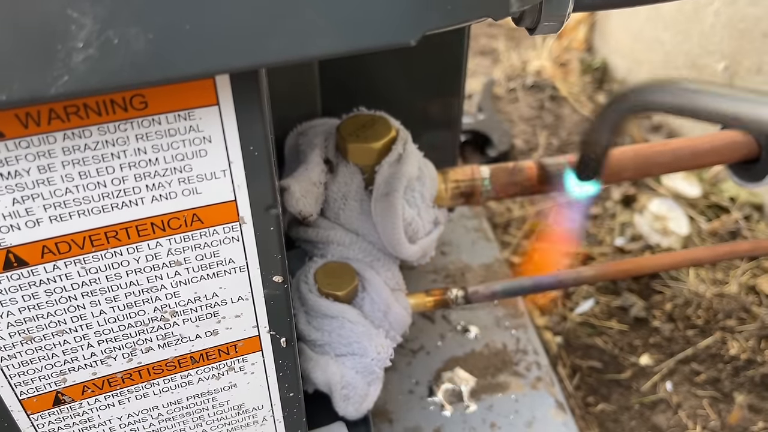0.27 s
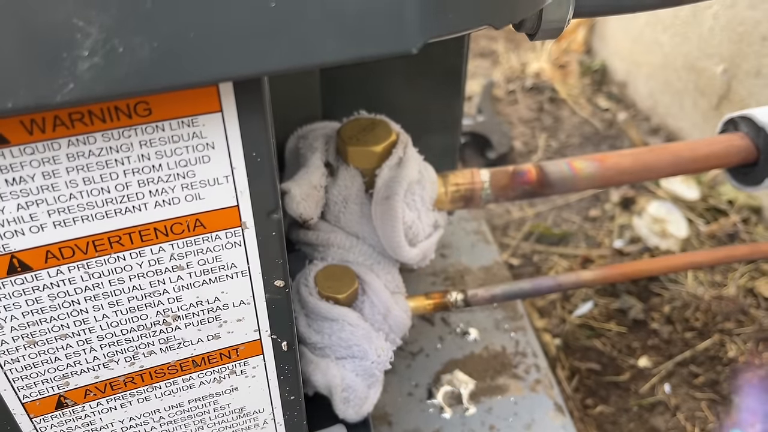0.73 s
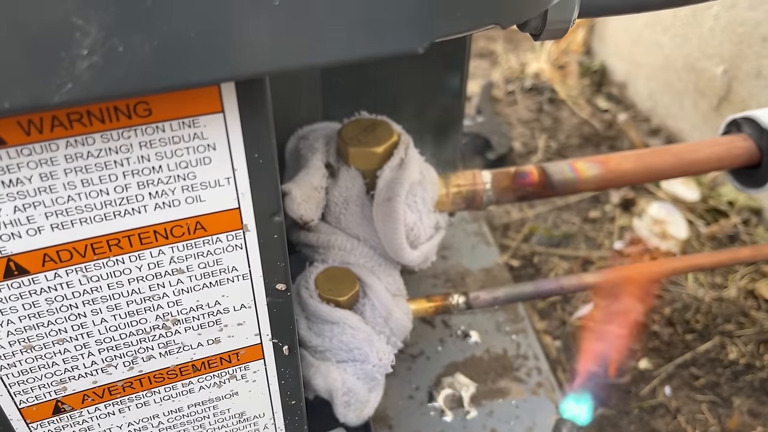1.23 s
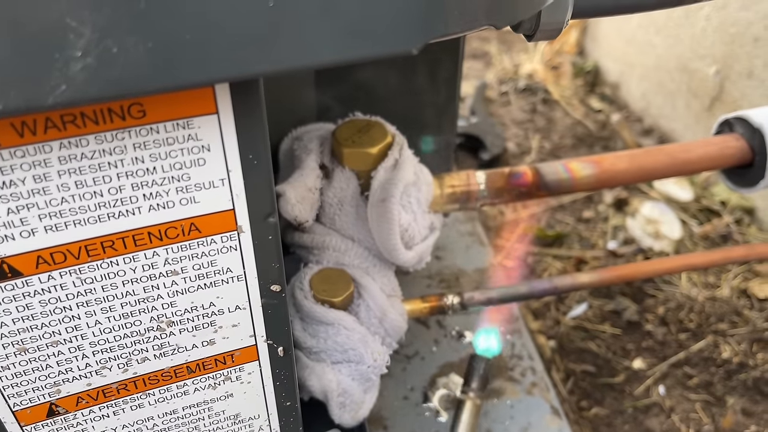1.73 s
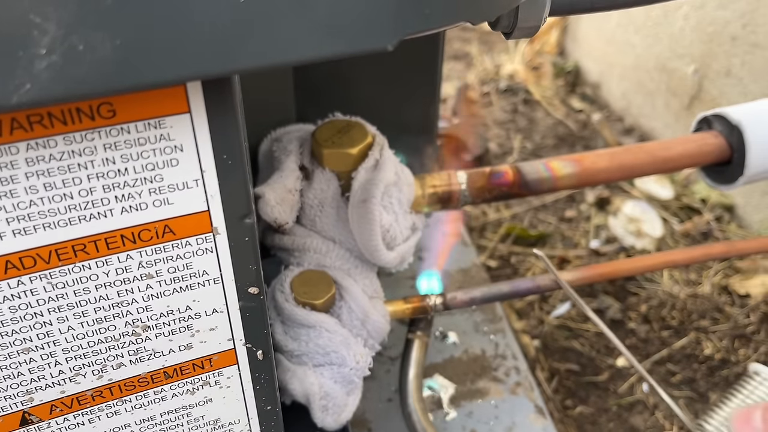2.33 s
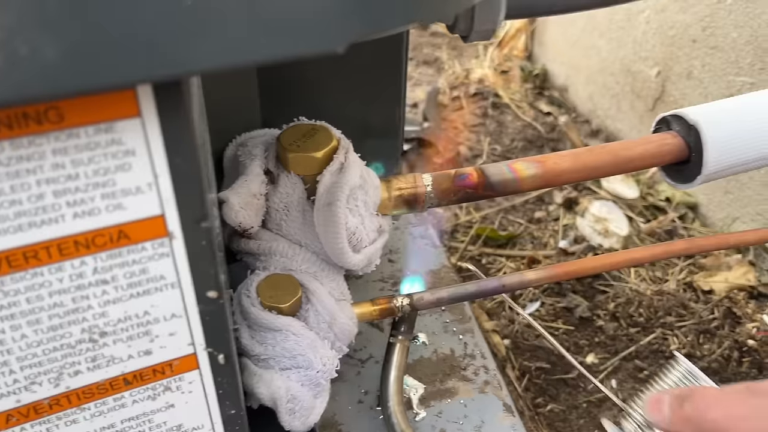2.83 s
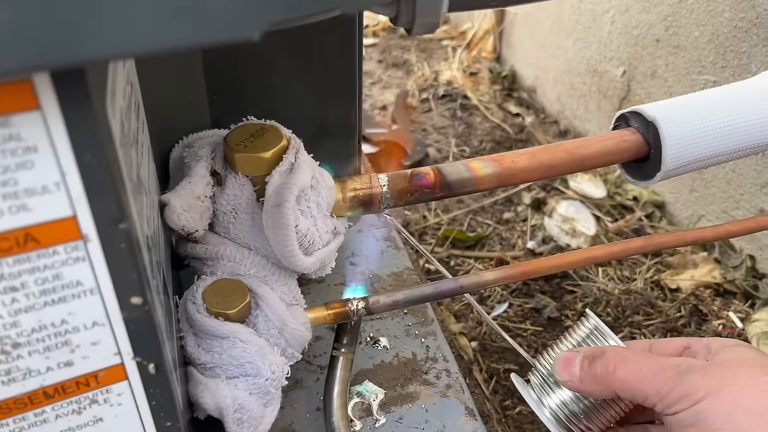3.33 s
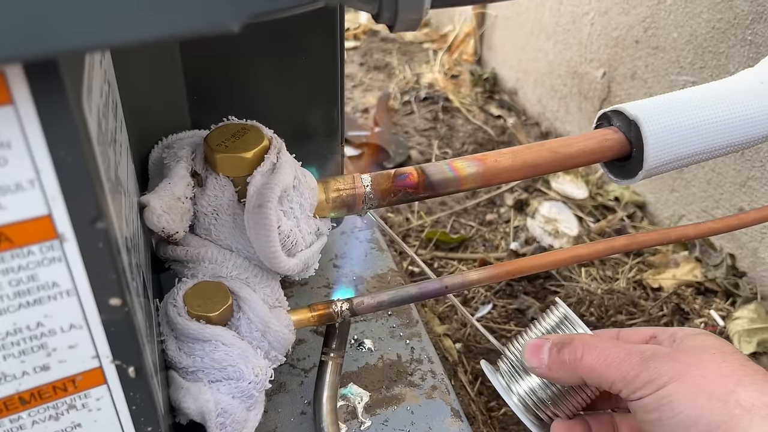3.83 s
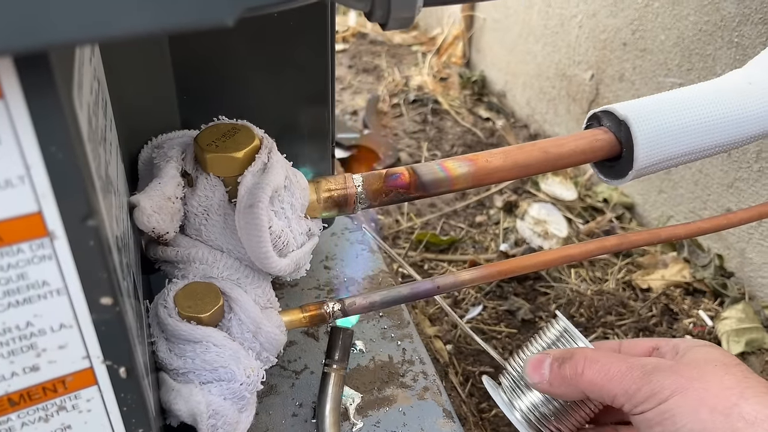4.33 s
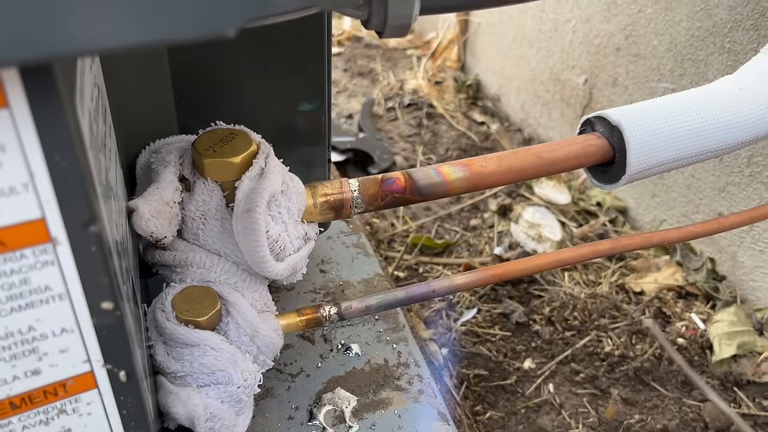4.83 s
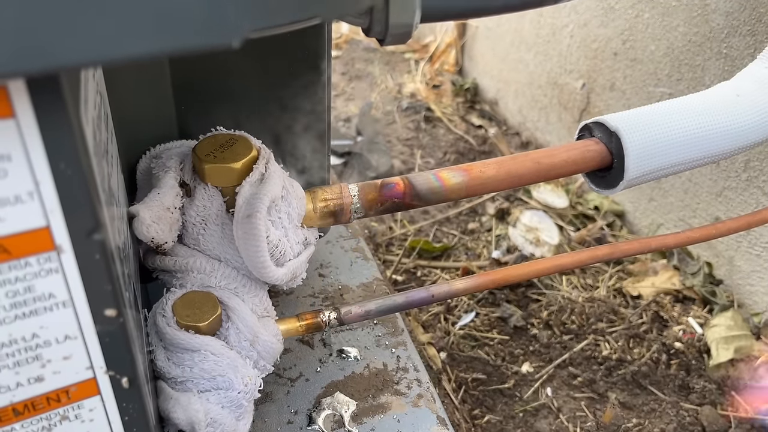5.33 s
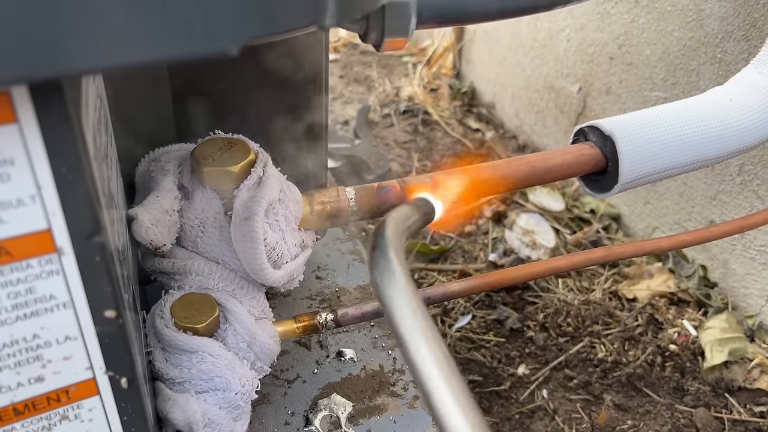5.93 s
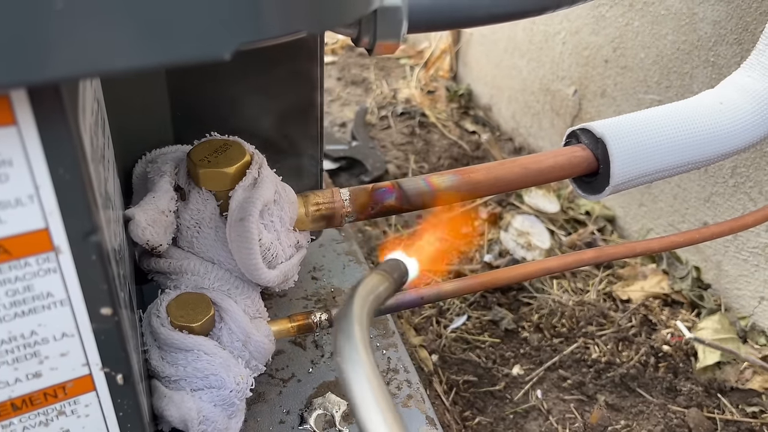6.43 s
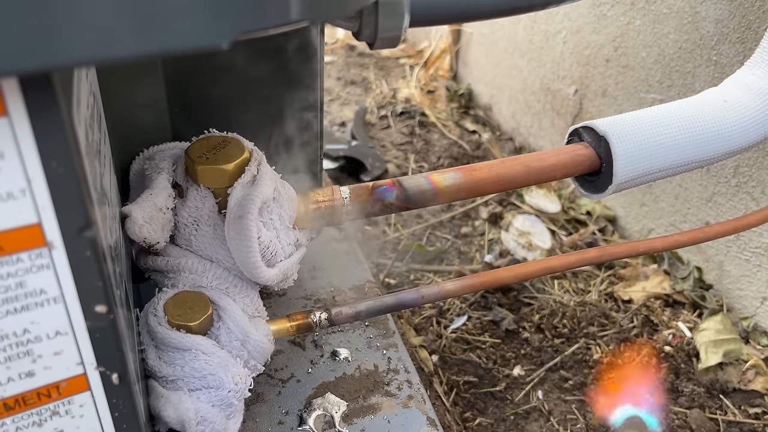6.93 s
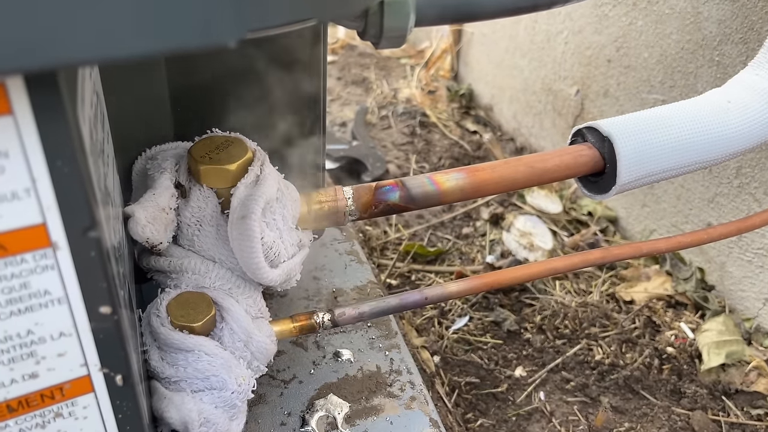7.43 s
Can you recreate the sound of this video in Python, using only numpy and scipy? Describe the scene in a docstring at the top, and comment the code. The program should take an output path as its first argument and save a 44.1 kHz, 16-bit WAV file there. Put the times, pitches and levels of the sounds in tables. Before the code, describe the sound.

A handheld gas torch hisses steadily up close outdoors, its bright rushing tone sweeping like a flanger as the flame moves around copper pipes.

```python
"""Roar, hiss and sizzle of a hand-held gas torch, close to a two-port microphone outdoors.
One noise, coloured as three layers of flame, arrives directly and by short echoes off a sheet-metal
cabinet, pipes and ground. As the hand moves, the echo delays glide: the hiss sweeps like a flanger.
Weak later echoes differ between the ports. Behind it lies a low outdoor rumble of filtered noise."""
import sys
import numpy as np
from scipy import signal
from scipy.io import wavfile
from scipy.ndimage import uniform_filter1d

SR = 44100
rng = np.random.default_rng(int(sys.argv[2]) if len(sys.argv) > 2 else 0)


def generate_wav(signal):
    """Clip the signal to [-1, 1] and save it as 16-bit WAV at the path in sys.argv[1]."""
    frames = np.transpose(np.atleast_2d(signal))
    scaled = np.clip(frames, -1, 1) * 32767
    pcm = np.round(scaled).astype(np.int16)
    wavfile.write(sys.argv[1], SR, pcm)


def natural_amplitude(level_db):
    """Convert a level in decibels to a linear amplitude factor, elementwise."""
    exponent = np.asarray(level_db, float) / 20
    return 10 ** exponent


N = 338247

# Flame layer levels and hiss balance: time_s, hiss_db, roar_re_hiss_db, sizzle_re_hiss_db, left_re_right_db
LAYER_LEVELS = [(0, -53, -8.5, -7, 3.5), (.22, -53.5, -9, -14.5, 2.5), (.33, -47, -15.5, -11, 1),
                (.42, -49.5, -14.5, -13, 0.5), (.66, -49, -14.5, -7.5, 1.5), (.8, -51.5, -14, -12.5, 2),
                (1.2, -49, -13, -15.5, 1), (1.38, -53, -7, -12, 1), (1.46, -49, -11.5, -11, 2),
                (1.62, -51, -9, -4, 1), (1.88, -51, -8.5, -18, 4), (2.55, -52.5, -6.5, -13, 5),
                (2.8, -51.5, -7.5, -9.5, 6.5), (2.95, -49.5, -10, -14, 6), (3.8, -50.5, -9.5, -11.5, 5.5),
                (4.2, -48.5, -11, -14.5, 5), (4.5, -50.5, -9, -10.5, 6.5), (4.92, -46, -13, -13, 2.5),
                (5.2, -51, -12.5, -15.5, 0.5), (5.6, -49, -11.5, -11.5, 2.5), (5.8, -49.5, -11, -12.5, 4),
                (6.05, -47.5, -15, -11.5, 5), (6.2, -49.5, -10, -13, 6), (6.65, -49, -12.5, -13, 5),
                (6.77, -51.5, -10.5, -10, 5), (6.87, -50, -11.5, -14.5, 3), (7.15, -51.5, -13.5, -12, 2.5),
                (7.67, -53, -20, -10.5, 1)]
# Flame colour at its low and high ends: freq_hz, relative_density_db_per_hz
FLAME_ENDS = [(200, -59), (290, -10), (10500, 3.5), (12000, -8), (13500, -16)]
# Colour between, with torch tube and microphone resonances:
# freq_hz, relative_density_db_per_hz, left_re_right_db
RESONANCES = [(340, -7.5, 3), (460, 0, -2), (543, 0, -2), (865, -1, 1), (1114, -7, -0.5), (1500, -0.2, 1.5),
              (1650, -0.7, 7), (1970, -3, -0.5), (2270, 0.5, -2), (2380, 0, 3.5), (3140, 0.5, 1),
              (3200, -1, 11.5), (3520, 5, 1.5), (3820, 7.5, 8), (4086, 2.1, -14.5), (4240, -1, 8.5),
              (4740, -3, 9.5), (5470, 0.5, 4.5), (5620, -6, -12), (6050, 0.2, 1.5), (6930, -2.5, 11.5),
              (7360, -4.5, -6), (7640, -2.5, 0), (8580, -0.5, 2), (8600, -3.5, -0.5)]
# Crossovers of the layers: roar_to_hiss_hz, hiss_to_sizzle_hz
CROSSOVERS_HZ = 1620, 9600
# Phase between the ports: freq_hz, left_lead_rad
PORT_PHASE = [(100, .1), (300, .15), (700, .4), (1200, .7), (2000, .52), (2700, .78), (3800, .35),
              (4400, .3), (5300, .6), (6500, .25), (7700, .75), (8600, 0), (9500, -1.8), (10250, -np.pi),
              (11800, -2 * np.pi)]
# Diffuse sound, independent per port: freq_hz, gain_re_jet_noise
DIFFUSE_GAIN = [(300, 0.21), (700, 0.076), (2000, 0.073), (4000, 0.034), (8000, .04), (10500, 0.016),
                (12500, 0.82)]
# How far the hand has carried the torch from the joint: time_s, reach_m
HAND_REACH = [(0, .05), (.6, .3), (.85, .2), (1.15, .3), (1.4, .1), (1.9, .02), (2.9, 0), (4.5, .01),
              (5.2, .3), (5.6, .2), (6.2, .12), (6.8, .2), (7.3, .4), (7.67, .45)]
# Wavering band of the hiss: time_s, centre_hz, peak_db
HISS_RIDGE = [(0, 3840, 3), (.62, 3900, -1.5), (.8, 3770, -1), (1.15, 3270, 3.5), (1.32, 3900, 2.5),
              (1.88, 3670, 0.5), (4.6, 3750, 1.5), (4.91, 3800, 5), (5.16, 3700, -1), (6, 3770, 1.5),
              (6.28, 3350, 4.5), (6.7, 3500, 2.5), (6.87, 3800, -1), (7, 3520, 3), (7.28, 3500, 3),
              (7.67, 3650, 3)]
# Echoes of eight surfaces as the hand moves: time_s, extra_delay_ms (8 columns),
# relative_gain (8 columns, negative off an edge)
ECHO_MOVES = [(0.0, 0.665, 0.535, 1.625, 0.74, 0.795, 2.09, 1.545, 0.18, -0.15, 0.05, 0.2, 0.2, -0.25, 0.15, 0.25, -0.15),
              (0.15, 0.555, 0.28, 1.7, 0.73, 0.845, 2.085, 1.55, 0.18, -0.25, 0.1, 0.1, 0.15, -0.1, 0.1, 0.2, -0.25),
              (0.3, 0.635, 0.455, 1.555, 0.77, 1.135, 2.14, 1.275, 0.175, -0.3, 0.35, 0.1, 0.2, -0.15, 0.1, 0.0, 0.0),
              (0.45, 0.615, 0.515, 1.515, 0.835, 1.125, 2.425, 1.25, 0.13, -0.25, 0.2, -0.15, -0.1, -0.1, 0.15, 0.1, 0.2),
              (0.6, 0.685, 0.43, 1.17, 0.685, 1.095, 2.475, 1.275, 0.225, -0.15, 0.15, 0.2, 0.1, -0.15, 0.1, 0.25, -0.1),
              (0.69, 0.585, 0.445, 1.175, 0.79, 1.03, 2.45, 1.51, 0.47, -0.2, 0.3, 0.25, 0.15, -0.2, -0.05, -0.25, -0.15),
              (0.78, 0.455, 0.3, 1.055, 0.785, 0.82, 2.39, 1.425, 0.69, -0.2, 0.05, 0.2, 0.3, -0.25, -0.15, -0.15, -0.05),
              (0.87, 0.5, 0.335, 0.865, 0.495, 0.725, 2.335, 1.09, 0.955, -0.2, 0.2, 0.2, 0.05, -0.2, -0.15, -0.05, 0.25),
              (0.96, 0.63, 0.295, 0.88, 0.42, 0.77, 2.055, 1.025, 0.935, -0.2, 0.15, -0.3, 0.1, 0.2, 0.2, 0.35, 0.2),
              (1.05, 0.495, 0.175, 0.975, 0.36, 0.835, 2.105, 1.04, 0.895, -0.2, -0.35, -0.25, 0.15, 0.1, 0.15, 0.1, -0.1),
              (1.14, 0.54, 0.17, 1.145, 0.4, 0.715, 1.84, 0.995, 0.84, -0.65, -0.3, 0.05, 0.3, 0.2, 0.2, -0.25, -0.2),
              (1.23, 0.5, 0.215, 1.515, 0.33, 0.685, 1.81, 0.935, 0.86, -0.3, -0.15, 0.1, 0.4, 0.35, 0.1, 0.1, -0.1),
              (1.32, 0.285, 0.095, 1.575, 0.31, 0.62, 2.11, 1.17, 0.81, -0.45, -0.05, 0.2, -0.2, 0.15, 0.1, -0.1, -0.2),
              (1.41, 0.315, 0.18, 1.805, 0.14, 0.58, 2.055, 1.245, 0.665, -0.45, 0.4, 0.1, -0.3, 0.05, 0.0, -0.2, -0.05),
              (1.55, 0.315, 0.18, 1.83, 0.09, 0.36, 1.985, 1.26, 0.975, -0.35, 0.25, 0.1, -0.2, 0.05, 0.1, -0.1, -0.05),
              (1.72, 0.34, 0.27, 1.75, 0.115, 0.235, 1.955, 1.205, 1.025, -0.3, 0.0, 0.1, -0.15, 0.1, 0.1, -0.1, -0.1),
              (1.82, 0.45, 0.65, 1.735, 0.13, 0.265, 1.9, 1.18, 1.215, -0.25, 0.2, 0.0, -0.35, 0.4, 0.2, -0.1, 0.15),
              (2.0, 0.405, 0.585, 1.71, 0.29, 0.16, 1.58, 0.875, 1.175, -0.4, 0.4, 0.25, 0.3, -0.2, 0.15, -0.1, 0.1),
              (2.4, 0.405, 0.57, 1.71, 0.395, 0.145, 1.525, 0.885, 1.175, -0.4, 0.3, 0.2, 0.1, -0.05, 0.2, -0.1, 0.2),
              (2.78, 0.44, 0.585, 1.695, 0.54, 0.18, 1.49, 0.93, 1.16, -0.25, 0.2, 0.25, 0.35, 0.15, 0.15, -0.15, 0.2),
              (2.92, 0.205, 0.425, 1.675, 0.555, 0.065, 1.31, 0.94, 0.955, 0.2, -0.45, 0.15, 0.35, -0.3, 0.1, -0.15, -0.1),
              (3.6, 0.19, 0.445, 1.745, 0.555, 0.095, 1.405, 0.97, 0.96, 0.45, -0.35, 0.25, 0.35, -0.25, -0.1, -0.15, -0.1),
              (4.3, 0.175, 0.435, 1.77, 0.55, 0.11, 1.395, 0.945, 0.975, 0.5, -0.35, 0.3, 0.25, -0.3, -0.2, -0.1, -0.15),
              (4.5, 0.16, 0.46, 1.725, 0.535, 0.07, 1.455, 0.965, 1.275, 0.35, -0.3, 0.3, 0.2, -0.4, 0.0, -0.05, 0.0),
              (4.62, 0.185, 0.41, 1.765, 0.72, 0.1, 1.585, 0.86, 1.555, 0.35, -0.1, 0.2, 0.0, -0.2, 0.0, -0.25, 0.0),
              (4.74, 0.205, 0.515, 1.43, 1.045, 0.145, 1.545, 0.955, 1.805, 0.4, 0.1, -0.2, 0.15, -0.1, 0.2, -0.1, 0.1),
              (4.86, 0.235, 0.67, 1.445, 1.215, 0.36, 1.705, 1.005, 2.06, 0.4, 0.15, -0.1, 0.15, -0.25, 0.2, 0.2, -0.1),
              (4.98, 0.31, 0.81, 1.17, 1.46, 0.37, 1.925, 1.0, 2.35, 0.2, 0.25, 0.05, 0.1, 0.1, -0.1, 0.05, 0.2),
              (5.1, 0.245, 0.935, 1.22, 1.75, 0.51, 1.905, 1.05, 2.32, -0.15, 0.1, 0.2, 0.25, 0.0, -0.2, -0.15, 0.25),
              (5.22, 0.29, 1.015, 1.225, 1.67, 0.455, 2.015, 1.12, 2.325, -0.15, 0.1, 0.15, 0.05, 0.1, -0.1, -0.05, 0.2),
              (5.35, 0.235, 1.265, 0.89, 1.515, 0.435, 2.135, 1.025, 2.355, -0.25, -0.1, 0.0, 0.1, 0.25, -0.15, 0.1, 0.05),
              (5.53, 0.565, 1.19, 0.64, 1.42, 0.475, 1.87, 0.96, 2.315, 0.1, -0.2, 0.15, 0.25, 0.15, -0.05, 0.1, 0.1),
              (5.71, 0.825, 1.415, 0.63, 1.54, 0.485, 1.79, 0.965, 2.165, -0.2, 0.2, 0.25, 0.1, -0.15, -0.1, -0.1, 0.05),
              (5.89, 0.74, 1.415, 0.545, 1.46, 0.385, 1.815, 0.925, 2.07, -0.3, 0.2, 0.2, -0.1, -0.15, -0.15, -0.1, 0.1),
              (6.07, 0.705, 1.325, 0.41, 1.195, 0.515, 1.51, 0.97, 2.12, -0.1, 0.15, -0.05, 0.1, 0.15, 0.0, -0.05, 0.1),
              (6.25, 0.795, 1.455, 0.475, 1.225, 0.54, 1.54, 0.915, 2.095, -0.35, 0.2, -0.4, 0.25, 0.2, 0.15, -0.2, 0.1),
              (6.43, 0.765, 1.665, 0.415, 1.16, 0.645, 1.335, 1.025, 2.375, -0.25, -0.2, -0.25, 0.15, 0.15, 0.15, -0.15, 0.05),
              (6.61, 0.7, 1.71, 0.215, 1.225, 0.63, 1.365, 1.055, 2.55, 0.0, -0.2, 0.3, -0.2, 0.25, 0.1, -0.1, 0.05),
              (6.79, 0.565, 1.33, 0.175, 1.215, 0.705, 1.49, 0.9, 2.365, 0.1, 0.15, 0.1, -0.1, -0.1, 0.2, 0.05, 0.15),
              (6.9, 0.155, 1.15, 0.245, 1.3, 0.65, 1.795, 0.985, 2.255, -0.2, -0.2, 0.1, 0.15, -0.15, -0.2, 0.1, 0.1),
              (7.02, 0.235, 1.05, 0.47, 1.285, 0.42, 1.97, 0.975, 2.31, -0.15, -0.3, -0.1, 0.2, -0.15, -0.05, 0.25, 0.15),
              (7.14, 0.235, 1.285, 0.845, 1.41, 0.14, 2.17, 1.19, 2.16, -0.35, 0.0, 0.0, 0.25, 0.15, -0.05, -0.1, 0.05),
              (7.26, 0.575, 1.35, 0.685, 1.655, 0.19, 2.32, 1.515, 2.115, 0.25, -0.25, -0.3, 0.05, 0.2, -0.15, -0.1, 0.1),
              (7.38, 0.52, 1.57, 0.625, 1.305, 0.335, 2.325, 1.65, 2.1, -0.6, -0.15, 0.25, -0.15, 0.25, -0.15, -0.2, 0.15),
              (7.67, 0.485, 1.46, 0.785, 1.205, 0.165, 2.375, 1.645, 2.305, 0.2, -0.3, 0.2, 0.2, 0.1, -0.15, -0.15, 0.0)]
# Outdoor background colour: freq_hz, relative_density_db_per_hz
RUMBLE_COLOUR = [(24, -36), (40, -32), (92, 3.5), (135, -1), (195, 0.5), (260, -14), (340, -33),
                 (570, -120)]

FFT_SIZE, OVERLAP = 1024, 768  # samples
BIN_HZ = np.fft.rfftfreq(FFT_SIZE, 1 / SR)
COLUMN_HZ = BIN_HZ[:, None]


def over_frequency(points):
    """Interpolates a table over log frequency, as a column of bins."""
    hz, value = np.transpose(points)
    return np.interp(np.log(BIN_HZ + 1), np.log(hz + 1), value)[:, None]


def over_time(points, time_s):
    """Interpolates each column of a time table at the frame times."""
    point_s, *columns = np.transpose(points)
    return np.array([np.interp(time_s, point_s, column) for column in columns])


def white_spectra(channels):
    """Frame times and short-time spectra of white noise."""
    noise = rng.standard_normal((channels, N))
    return signal.stft(noise, SR, nperseg=FFT_SIZE, noverlap=OVERLAP)[1:]


def to_samples(spectra):
    """Overlap-adds short-time spectra back to samples."""
    return signal.istft(spectra, SR, nperseg=FFT_SIZE, noverlap=OVERLAP)[1][:, :N]


def torch():
    """One jet noise through flame colour and echo paths; diffuse noise differs per port."""
    time_s, (jet, *diffuse) = white_spectra(channels=3)
    hiss_db, roar_db, sizzle_db, pan_db = over_time(LAYER_LEVELS, time_s)
    sides = np.array([.5, -.5])[:, None, None]  # left, right
    colour = flame_colour(time_s, sides)
    low, high = (1 / (1 + (COLUMN_HZ / hz) ** 6) for hz in CROSSOVERS_HZ)
    route = echo_paths(time_s) + clutter(time_s)

    def layer(share, db, over):
        """Scales one layer to its level with echoes included."""
        power = np.mean(abs(share * colour * route) ** 2, over, keepdims=True)
        return share * colour * natural_amplitude(hiss_db + db) / np.sqrt(power)

    roar = layer(low, roar_db + 0.43 * sides * pan_db, over=1)
    hiss = layer(high - low, sides * pan_db, over=1)
    sizzle = layer(1 - high, sizzle_db, over=(0, 1))  # not panned
    flame = (roar + hiss + sizzle) * flutter(len(time_s))

    shared_route = route.mean(0)
    arriving = shared_route * jet + over_frequency(DIFFUSE_GAIN) * np.array(diffuse)
    phase_rad = over_frequency(PORT_PHASE)
    in_ports = flame * np.exp(1j * sides * phase_rad) * arriving
    # echoes from the sides reach the ports in opposite sign
    opposed = flame.mean(0) * (route - shared_route) * jet
    return to_samples(in_ports + opposed * np.cos(phase_rad / 2))


def flame_colour(time_s, sides, ridge_width_hz=310):
    """Spectral gain per port: flame and resonances, shading near the joint, wavering ridge."""
    middle = [(hz, db) for hz, db, _ in RESONANCES]
    whole = sorted(FLAME_ENDS + middle + [(SR / 2, -60)])
    balance_db = over_frequency([(hz, db) for hz, _, db in RESONANCES])
    colour = natural_amplitude(over_frequency(whole) + sides * balance_db)

    # held in under the joint, the top treble is shaded
    tucked = np.exp(-over_time(HAND_REACH, time_s)[0] / .04)
    colour = colour * natural_amplitude(-4.5 * tucked / (1 + (11500 / (COLUMN_HZ + 1)) ** 16))

    centre_hz, peak_db = over_time(HISS_RIDGE, time_s)
    offset = 2 * (COLUMN_HZ - centre_hz) / ridge_width_hz
    return colour * natural_amplitude(peak_db / (1 + offset ** 2))


def flutter(frames, wide_db=0.45, patchy_db=2.0):
    """Turbulence: quick wide flutter and small patches (rms dB), fading out below 1500 Hz."""
    wide = uniform_filter1d(rng.standard_normal(frames), size=14)
    patches = rng.standard_normal((len(BIN_HZ), frames))
    patches = uniform_filter1d(patches, size=10, axis=0)
    patches = uniform_filter1d(patches, size=10)
    high = COLUMN_HZ / (COLUMN_HZ + 1500)
    return natural_amplitude(high * (wide_db * wide / wide.std() + patchy_db * patches / patches.std()))


def echo_paths(time_s, dull_hz=12000, strength=1.4):
    """Direct sound plus echoes whose delay and gain glide with the hand: moving comb filter."""
    paths = np.ones((len(BIN_HZ), len(time_s)), complex)
    dull = strength / (1 + (COLUMN_HZ / dull_hz) ** 2)  # echoes lose treble
    delays_ms, gains = np.split(over_time(ECHO_MOVES, time_s), 2)
    for delay_ms, gain in zip(delays_ms, gains):
        paths += dull * gain * np.exp(-2j * np.pi * COLUMN_HZ * delay_ms / 1000)
    return paths


def clutter(time_s, count=16, shared_gain=.04, unlike_gain=.22):
    """Weak later echoes off the yard's small things; paths stretch or shrink with torch reach."""
    late, facing, left, right = rng.random((count, 4)).T
    reach_m = over_time(HAND_REACH, time_s[::4])[0]  # every fourth frame
    stretch_s = np.outer(2 * facing - 1, reach_m) / 343  # speed of sound, m/s
    delay_s = (.001 + .006 * late)[:, None] + stretch_s
    echoes = np.exp(-2j * np.pi * BIN_HZ[:, None, None] * delay_s)
    mid = np.einsum("fkt,k->ft", echoes, shared_gain * (left + right))
    side = np.einsum("fkt,k->ft", echoes, unlike_gain * (left - right))
    # bass and top octave stay alike in the ports
    apart = (1 - 1 / (1 + (COLUMN_HZ / 600) ** 2)) / (1 + (COLUMN_HZ / 7300) ** 12)
    ports = [mid + apart * side, mid - apart * side]
    return np.repeat(ports, 4, axis=2)[:, :, :len(time_s)]


def rumble(level_db=-75.5, width=0.18):
    """Low outdoor background: coloured noise, nearly the same in both ports."""
    _, (both, left, right) = white_spectra(channels=3)
    colour = natural_amplitude(over_frequency(RUMBLE_COLOUR))
    colour = colour / np.sqrt(np.mean(colour ** 2))
    return to_samples(natural_amplitude(level_db) * colour * (both + width * np.array([left, right])))


def scene():
    """Torch over the background."""
    return torch() + rumble()


def roll_off(x):
    """The treble ends steeply here."""
    return signal.sosfilt(signal.butter(12, 12880, fs=SR, output="sos"), x)


def record(dry):
    """The finished mix as stored."""
    return roll_off(dry)


dry = scene()
out = record(dry)
generate_wav(out)
```